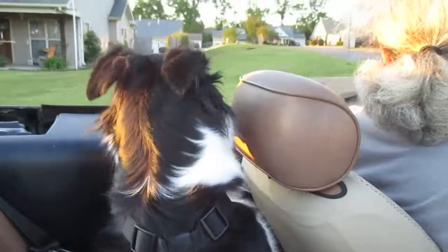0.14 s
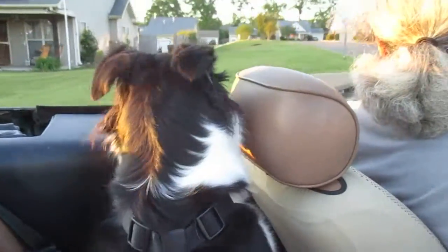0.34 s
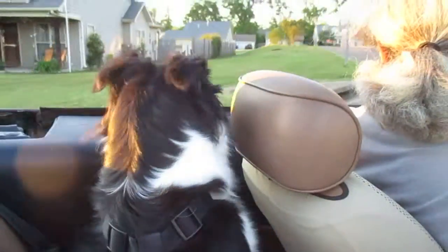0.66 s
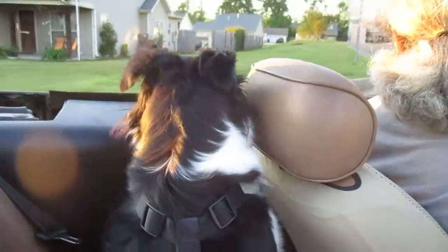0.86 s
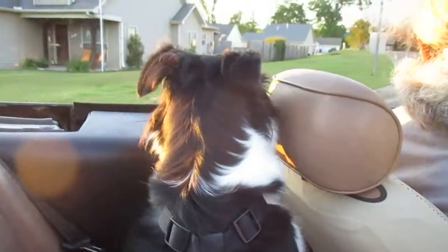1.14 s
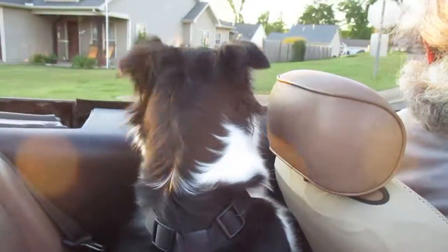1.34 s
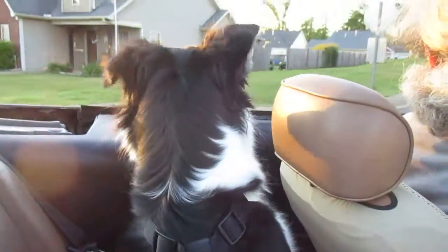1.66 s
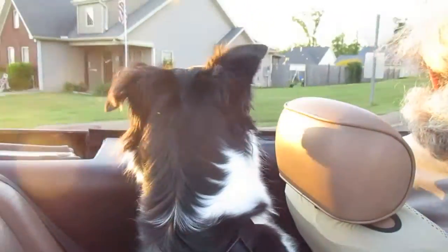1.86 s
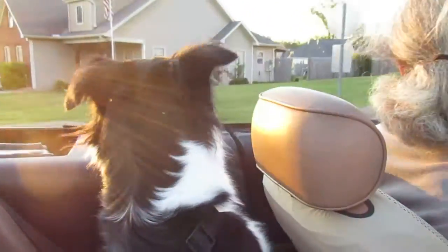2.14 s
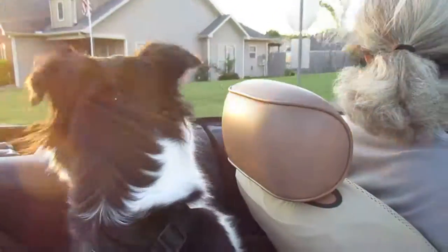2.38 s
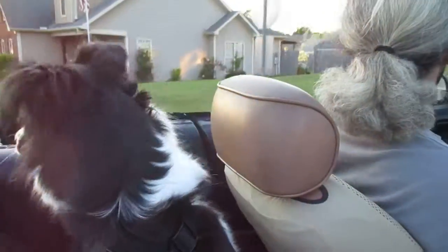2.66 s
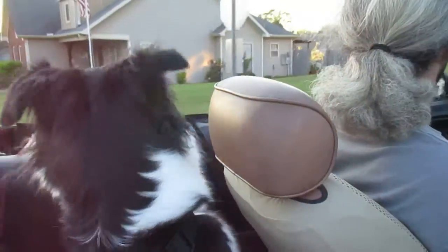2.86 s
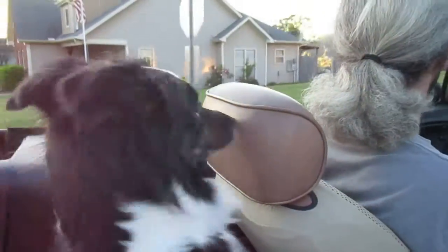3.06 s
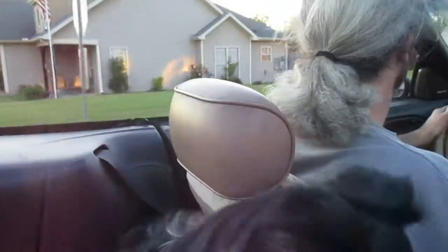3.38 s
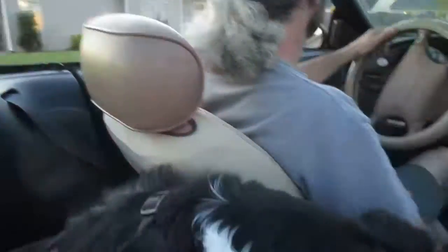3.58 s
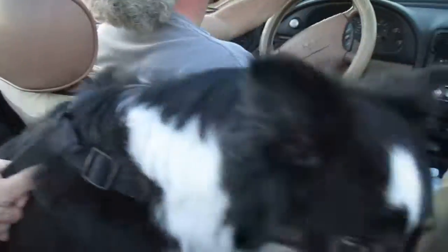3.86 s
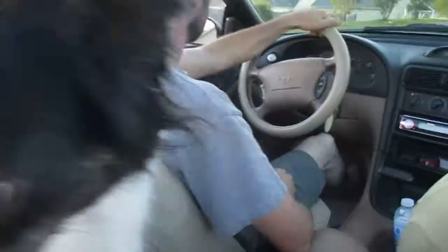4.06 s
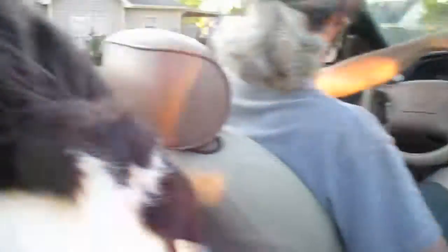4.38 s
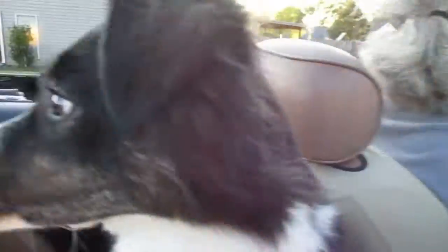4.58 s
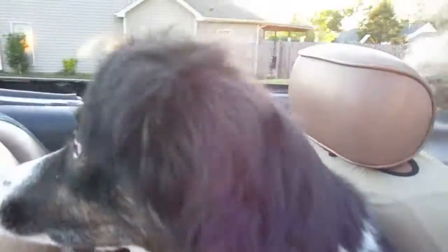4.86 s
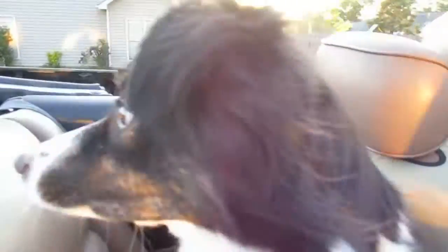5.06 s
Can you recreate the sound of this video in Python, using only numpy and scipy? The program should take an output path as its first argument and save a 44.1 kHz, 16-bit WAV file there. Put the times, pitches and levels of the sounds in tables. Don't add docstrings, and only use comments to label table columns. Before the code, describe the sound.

From the back seat of a convertible, the engine revs up and swells as buffeting wind pops and finally overloads the microphone.

```python
import sys
import numpy as np
from scipy import signal
from scipy.fft import rfft, irfft
from scipy.io import wavfile

SR = 44100
rng = np.random.default_rng(int(sys.argv[2]) if len(sys.argv) > 2 else 0)


def dump(signal):
    limited = np.clip(np.atleast_2d(signal).T, -1, 1)
    pcm = np.round(limited * 32767).astype(np.int16)
    wavfile.write(sys.argv[1], SR, pcm)


def ratio(d):
    e = np.asarray(d, float) / 20
    return 10 ** e


N = 230241


def in_time(rows):
    s, *columns = np.transpose(rows)
    return [np.interp(np.arange(N) / SR, s, c) for c in columns]


def at_hz(points, hz):
    point_hz, point_db = np.array(points).T
    return np.interp(np.log(hz), np.log(point_hz), point_db)


def rms_one(x):
    return x / np.sqrt(np.mean(x ** 2) + 1e-20)


def drift(rate_hz):
    r = np.exp(-2 * np.pi * rate_hz * 20 / SR)
    settle = 4000
    slow = signal.lfilter([1], [1, -2 * r, r * r], rng.standard_normal(N // 20 + settle + 2))[settle:]
    return np.interp(np.arange(N) / 20, np.arange(len(slow)), rms_one(slow))


def coloured(spectrum):
    hz = np.maximum(np.fft.rfftfreq(N, 1 / SR), 1)
    inside = (hz >= spectrum[0][0]) & (hz <= spectrum[-1][0])
    return rms_one(irfft(rfft(rng.standard_normal(N)) * ratio(at_hz(spectrum, hz)) * inside, N))


def band(x, low_hz, high_hz, order=2):
    return signal.sosfilt(signal.butter(order, [low_hz, high_hz], "band", fs=SR, output="sos"), x)


def resonant(spectrum, peaks):
    out = coloured(spectrum)
    for hz, width, peak_db in peaks:
        narrow = band(rng.standard_normal(N), hz - width / 2, hz + width / 2)
        out = out + ratio(peak_db) * rms_one(narrow)
    return out


def struck(times, levels_db):
    clicks = np.zeros(N)
    clicks[np.round(times * SR).astype(int)] = ratio(levels_db)
    return clicks


def ring(clicks, hz, t60):
    r = ratio(-60 / (t60 * SR))
    w = 2 * np.pi * hz / SR
    return signal.lfilter([0, np.sin(w)], [1, -2 * r * np.cos(w), r * r], clicks + 1e-18)


# (start [s], end [s], start pitch [Hz], end pitch [Hz], level [dB])
BIRD_CHIRPS = [
    (1.09, 1.115, 3700, 4200, -69),
    (1.2, 1.235, 3350, 2930, -62),
    (1.325, 1.35, 2750, 2480, -62),
    (1.42, 1.47, 2930, 3200, -61),
]


def bird():
    t, out = np.arange(N) / SR, 0
    for s, end, hz, end_hz, db in BIRD_CHIRPS:
        along = np.clip((t - s) / (end - s), 0, 1)
        phase = 2 * np.pi * np.cumsum(hz + (end_hz - hz) * along) / SR
        out = out + ratio(db) * np.sin(np.pi * along) * np.sin(phase)
    return out


# (time [s], peak level [dB])
STRAP_TICKS = [
    (0.2543, -35),
    (0.5983, -34),
    (0.61, -38),
    (3.768, -33.5),
    (3.8323, -29),
    (4.0163, -25),
    (4.095, -25),
    (5.0917, -27),
    (5.1031, -29.5),
    (5.1393, -27),
]


def ticks():
    s, peak_db = np.transpose(STRAP_TICKS)
    fade = np.exp(-1 / (0.0022 * SR))
    puffs = signal.lfilter([1], [1, -fade], struck(s, peak_db) + 1e-18)
    return puffs * rms_one(band(rng.standard_normal(N), 2500, 7800)) * ratio(-21.0)


# (time [s], peak level [dB], low ring level [dB], second tag level [dB])
TAG_HITS = [
    (.299, -57, -7, -30),
    (.425, -64, -12, -30),
    (.457, -66, -12, -30),
    (2.745, -58, -30, -30),
    (3.156, -53, -30, -30),
    (3.602, -38, -5, -20),
    (3.662, -46, -9, -12),
    (3.9, -67, -20, -30),
    (4.228, -50, -30, 0),
    (4.285, -55, -30, -20),
]
# (pitch [Hz], level [dB], t60 [s])
TAG_MODES = [(6694, -4, .2), (6712, -4, .2), (11970, 0, .1), (11982, -14, .25), (14670, -17, .13)]
# (pitch [Hz], level [dB], t60 [s])
SECOND_TAG_MODES = [(6105, 0, .04), (4450, -12, .04), (8970, -14, .04)]


def collar():
    s, peak_db, low_db, second_db = np.transpose(TAG_HITS)
    out = ratio(22.5) * band(struck(s, peak_db), 3800, 12000)
    for k, (hz, db, t60) in enumerate(TAG_MODES):
        sign = -1 if k == 1 else 1
        out += sign * ring(struck(s, peak_db + db + low_db * (k < 2)), hz, t60)
    for hz, db, t60 in SECOND_TAG_MODES:
        out += ring(struck(s, peak_db + db + second_db), hz, t60)
    return out


# (frequency [Hz], density [dB per Hz])
HISS_SPECTRUM = [(1200, -4), (1400, -6), (2100, -2.5), (2830, -6), (3590, -7), (6000, -13), (9300, -23),
                 (12000, -32), (15500, -53)]
# (frequency [Hz], width [Hz], level [dB])
BAY_RESONANCES = [(1700, 80, -14), (2110, 130, -11), (2600, 120, -17), (3550, 220, -12), (4500, 200, -19)]
# (frequency [Hz], density [dB per Hz])
ROAR_SPECTRUM = [(140, 4.5), (200, 8.5), (330, 3.5), (420, -11), (520, 0), (860, -4.5), (1000, -19),
                 (1300, -26.5), (1800, -51.5)]
# (frequency [Hz], width [Hz], level [dB])
PANEL_RESONANCES = [(340, 30, -9), (520, 40, -12), (690, 50, -12), (860, 60, -14), (1030, 50, -20),
                    (1400, 90, -24)]
# (frequency [Hz], density [dB per Hz])
RUMBLE_SPECTRUM = [(18, -14), (30, -10), (50, 0), (75, 0), (100, -4), (150, -9), (220, -24)]


def rolling(turns, hiss_db):
    effort_db = hiss_db + 53
    throb_db = 0.46 * np.sin(2 * np.pi * turns) + 0.72 * np.sin(2 * np.pi * 10 * turns)
    roar_db = -37 + 1.07 * effort_db
    rumble_db = -29.5 + 0.36 * effort_db
    hiss = ratio(hiss_db + throb_db + 1.1 * drift(41)) * resonant(HISS_SPECTRUM, BAY_RESONANCES)
    roar = ratio(roar_db + 4.4 * throb_db + 0.6 * drift(50)) * resonant(ROAR_SPECTRUM, PANEL_RESONANCES)
    rumble = ratio(rumble_db + 0.6 * drift(0.68)) * coloured(RUMBLE_SPECTRUM)
    return hiss + roar + rumble


def eddy(t, hz, turn):
    return np.real(np.exp(2j * np.pi * turn) / (1 - 2j * np.pi * hz * t / 3) ** 4)


# (start [s], length [s], strength [dB])
WIND_GUSTS = [(0.098, 0.083, -22), (0.323, .02, -22.5), (0.458, 0.047, -21), (.58, .065, -20),
              (.725, 0.068, -30.5), (.9, 0.052, -18.5), (1.062, 0.023, -21), (1.327, 0.051, -18.5),
              (1.422, 0.1, -15.5), (1.58, 0.032, -18.5), (1.799, 0.044, -16.5), (1.911, 0.049, -14),
              (2.049, 0.044, -16.5), (2.531, 0.026, -16), (2.917, 0.024, -16), (3.272, .095, -9.5),
              (3.399, 0.12, -10), (3.75, .125, -9.5), (3.937, 0.038, -13), (4.02, 0.027, -20),
              (4.104, .055, -19), (4.219, .08, -12.5), (4.315, .045, -5.5), (4.478, 0.052, -7.5),
              (4.578, 0.063, -12.5), (4.66, 0.052, -8), (4.73, .12, -18), (4.878, .08, -13.5),
              (5.02, 0.12, -10), (5.15, 0.037, -5.5)]


def wind(rate):
    t = np.arange(N) / SR
    rise_db_per_s, fall_db_per_s = 903, 503.5
    level_db = -39 + 17 * np.log2(rate / rate[0])
    for s, length, db in WIND_GUSTS:
        before, after = np.maximum(s - t, 0), np.maximum(t - s - length, 0)
        off_db = rise_db_per_s * before + fall_db_per_s * after
        level_db = np.maximum(level_db, db - 7 - off_db)
    return level_db


# (frequency [Hz], density [dB per Hz])
BUFFET_SPECTRUM = [(40, -14), (90, 29), (160, -4.5), (370, 0.5), (860, -21.5), (1400, -24), (2900, -52),
                   (5000, -48)]


def buffeting(wind_db, rate):
    born = rng.random(N) < 420 * ratio(4.0 * drift(30)) / SR
    sizes = born * ratio(wind_db + 3.1 * np.minimum(rng.exponential(1, N), 3))
    centres = np.geomspace(120, 750, 8)
    dealt = rng.integers(0, 8, N)
    t = np.arange(-1024, 1025) / SR
    tilt_db = 9 - 6 * np.log2(rate / rate[0])
    swarm = np.zeros(N)
    for k, hz in enumerate(centres):
        pulses = signal.oaconvolve(sizes * (dealt == k), eddy(t, hz, rng.random()), "same")
        swarm += ratio(-tilt_db * np.log2(hz / 200)) * pulses
    low = ratio(wind_db - 14 + 0.4 * drift(26)) * coloured(BUFFET_SPECTRUM)
    return ratio(-3.5) * swarm + low


def shed(rate):
    gap_s, eddies = .009, []
    for (s, length, db), lucks in zip(WIND_GUSTS, rng.random((len(WIND_GUSTS), 20, 3))):
        faster = (rate[int(s * SR)] / rate[0]) ** 0.9
        for k, (late, weak, narrow) in enumerate(lucks):
            after = gap_s * (k + late)
            if after < length:
                peak_db = db - 5.5 - 10.5 * (weak - .5)
                eddies.append((s + after, peak_db, 130 * 2 ** (1.11 * narrow) * faster, -8.5))
    return eddies


# (time [s], peak level [dB], centre [Hz],
# companions level [dB])
SINGLE_EDDIES = [(0.016, -19, 264, 0.5), (0.189, -16.5, 280, -8), (0.362, -20, 250, -16),
                 (0.605, -12, 267, -11.5), (0.789, -20, 260, -2), (0.93, -13.5, 220, -5.5),
                 (1.369, -11, 374.4, -13), (1.466, -8, 386, -37), (1.512, -10, 288, -4.5),
                 (1.595, -13.5, 156.9, 2), (1.929, -16, 260, 8), (1.965, -5, 324, -15),
                 (2.927, -11.5, 224, -4), (3.292, -16.5, 449.8, -11.5), (3.314, 3, 230.7, -6.5),
                 (3.371, -5, 396.7, -18), (3.458, -6, 450, -16), (3.553, -12, 377.5, -16),
                 (3.781, -9, 264.4, -3.5), (3.846, 2, 223.1, -13.5), (3.896, -4, 378.3, -2.5),
                 (3.951, -7, 310, 1), (4.031, -16, 392, 5.5), (4.115, -9, 449.3, -4.5),
                 (4.151, -9, 310, -3.5), (4.281, 0, 254.3, -5), (4.339, 0.5, 298.5, -7),
                 (4.428, -5, 327, 1.5), (4.95, -10.5, 220.8, -3.5), (5.173, -8, 373.6, -6.5),
                 (0.168, -23, 333, -20), (0.492, -29, 380, -20), (1.434, -23, 480, -7),
                   (4.293, -14.5, 615, -17), (5.028, -12.5, 593, -16), (5.116, -12.5, 617.3, -14),
                   (1.33, -16.5, 497, -6.5), (1.471, -12.5, 740, -20), (3.31, -5, 562.4, -8),
                   (3.404, -23, 600, -20), (3.485, -14.5, 420, -15), (3.844, -9, 799, -15),
                   (3.893, -10, 950, -13), (4.281, -19, 900, -30), (4.322, -8.5, 807, -24),
                   (4.337, -8.5, 1380, -31), (4.344, -6.5, 580, 2.5), (4.358, -26, 690, -58),
                   (4.388, -11.5, 443, -1.5), (4.434, -16, 526, 3), (4.489, -8.5, 580, -13),
                   (4.589, -24.5, 521.6, 4.5), (4.69, -17, 585, 3), (4.882, -7.5, 499.7, -4),
                   (4.893, -16, 705, -9), (4.953, -22, 549.6, -2), (5.04, -24, 543, 4),
                   (5.091, -15, 651, 3.5), (5.179, -10.5, 660, -1), (5.2, -19.5, 524, 5.5)]


def pops(rate):
    half = 1024
    out, t = np.zeros(N + SR), np.arange(-half, half + 1) / SR
    events = SINGLE_EDDIES + shed(rate)
    for (s, peak_db, hz, trail_db), luck in zip(events, rng.random((600, 16))):
        burst = eddy(t, hz, luck[0])
        for turn, lag, narrow in luck[1:].reshape(5, 3):
            companion = eddy(t - .017 * (lag - .4), hz * (.7 + .8 * narrow), turn)
            burst = burst + ratio(trail_db - 5) * companion
        at = round(s * SR)
        out[at:at + len(t)] += ratio(peak_db) * burst
    return out[half:N + half]


ORDERS = np.arange(4, 19)
ORDER_LEVELS = [-4, -12, -3, -16, -30, -18, 0, -6, -18, -24, -7, -14, 0, -24, -20]
# (frequency [Hz], level [dB])
PIPE_RESONANCE = [(30, -22), (62, -19), (80, -20), (94, -17), (106, -8), (116, 0), (128, -3), (142, -11),
                  (165, -27), (260, -45)]
# (firing rate [Hz], level [dB])
FIRING_THUD = [(60, -11), (66, -16.5), (76, -5), (84, -11), (94, -14), (99, -22), (106, -4), (113, 0)]


def exhaust(turns, rate, load_db):
    firing_db = load_db + at_hz(FIRING_THUD, 8 * rate)
    boom = ratio(firing_db) * np.sin(2 * np.pi * 8 * turns)
    for k, order_db in zip(ORDERS, ORDER_LEVELS):
        phase = 2 * np.pi * (k * turns + rng.random()) + .12 * drift(3)
        level_db = load_db + order_db + at_hz(PIPE_RESONANCE, k * rate) + .8 * drift(5)
        boom += ratio(level_db) * np.sin(phase)
    overtones = band(.55 * boom ** 2 + .5 * boom ** 3, 200, 400)
    return boom + overtones


# (time [s], full cycles [per s])
ENGINE_SPEED = [(0, 7.8), (.3, 7.97), (.75, 7.67), (1.05, 7.9), (1.25, 7.93), (2.0, 9.42), (2.2, 10.06),
                (2.4, 11.23), (2.58, 11.73), (3.1, 11.74), (3.8, 12.31), (4.2, 13.2), (4.65, 14.04),
                (4.9, 14.18), (5.22, 14.16)]
# (time [s], exhaust load [dB], effort as engine bay hiss [dB])
ENGINE_WORK = [(0, -25, -67), (.5, -22, -67), (.8, -17, -66), (1.25, -17.5, -63), (1.6, -19.5, -61),
               (2, -19, -57), (2.28, -12, -52), (2.56, -8.5, -49), (2.8, -8.5, -53), (3.3, -8, -53),
               (3.75, -8.5, -55.5), (4.2, -9.5, -55.5), (4.4, -10, -54.5), (4.75, -12, -55), (5, -7, -54),
               (5.22, -14, -53)]


def scene():
    (rate,) = in_time(ENGINE_SPEED)
    load_db, hiss_db = in_time(ENGINE_WORK)
    turns = np.cumsum(rate) / SR
    small = bird() + ticks() + collar()
    air = buffeting(wind(rate), rate) + pops(rate)
    car = rolling(turns, hiss_db) + exhaust(turns, rate, load_db)
    return (small + air + car)[None]


def roll_off(x):
    return signal.sosfilt(signal.butter(12, 15820, fs=SR, output="sos"), x)


# (time [s], depth [dB], recovery [dB per s])
GAIN_DUCKS = [
    (3.318, 5, 12),
    (3.85, 2.5, 15),
    (4.284, 2.5, 30),
    (4.345, 11, 32),
]


def record(dry):
    t, duck_db = np.arange(N) / SR, 0
    for s, depth_db, recovery in GAIN_DUCKS:
        onset = np.clip((t - s) / 0.0075, 0, 1)
        duck_db = duck_db + np.maximum(depth_db - recovery * (t - s), 0) * onset
    x = dry * ratio(-duck_db)
    x = x / (1 + x ** 6) ** (1 / 6)
    preamp_hiss = ratio(-72) * signal.lfilter([.3], [1, -.7], rng.standard_normal(N))
    return roll_off(x + preamp_hiss)


dry = scene()
out = record(dry)
dump(out)
```